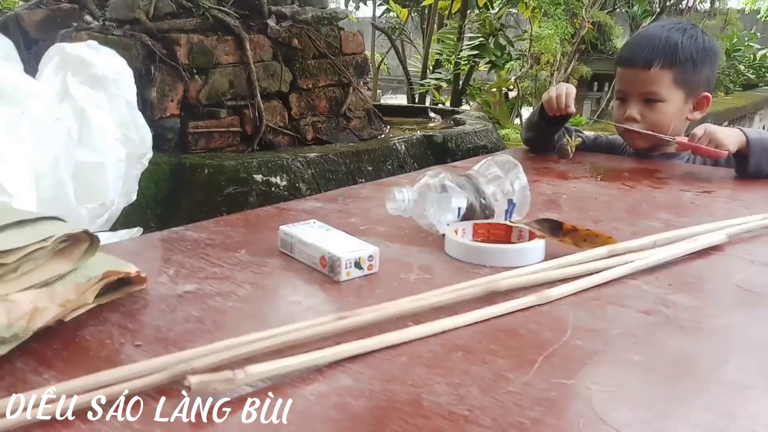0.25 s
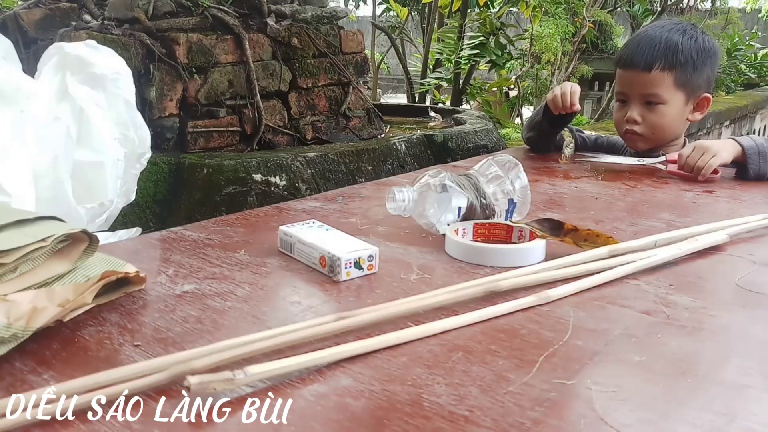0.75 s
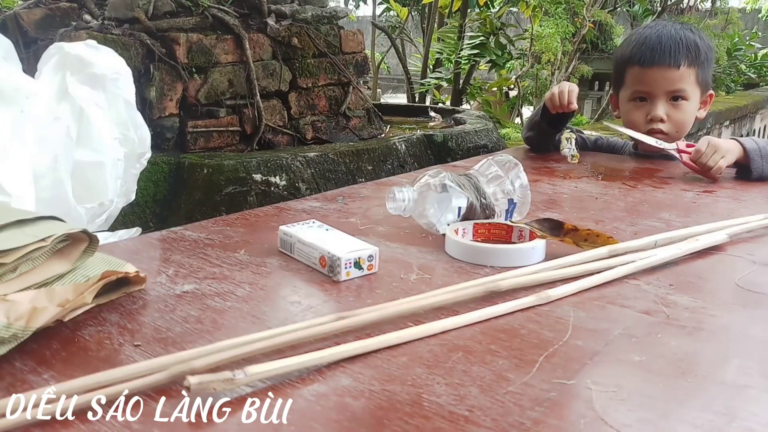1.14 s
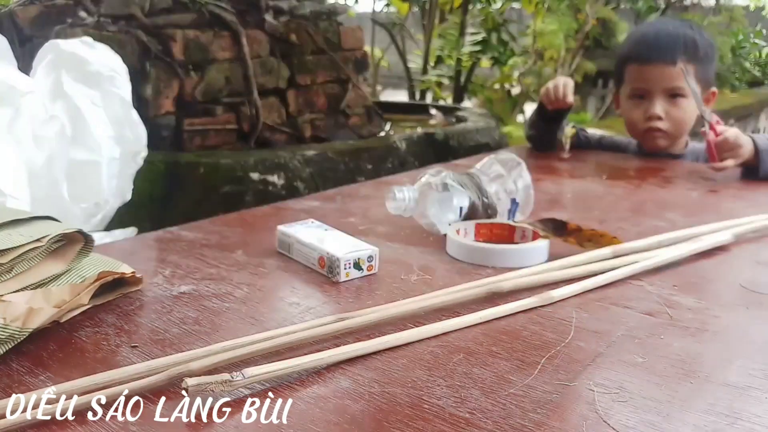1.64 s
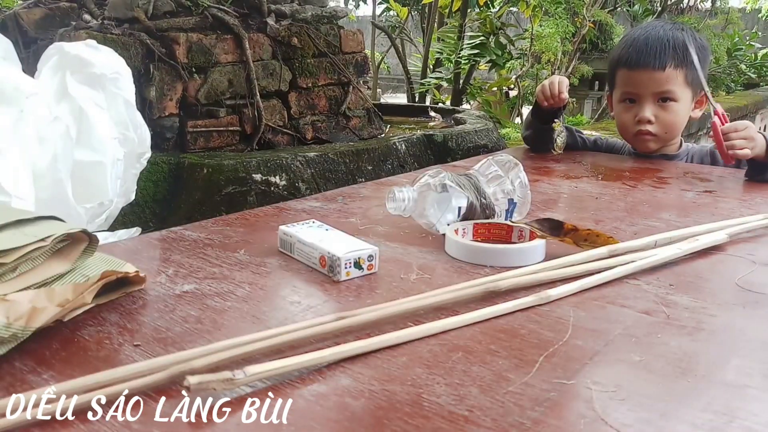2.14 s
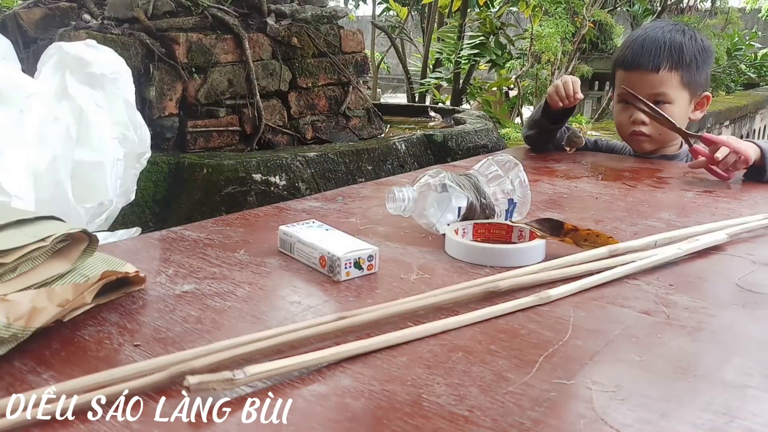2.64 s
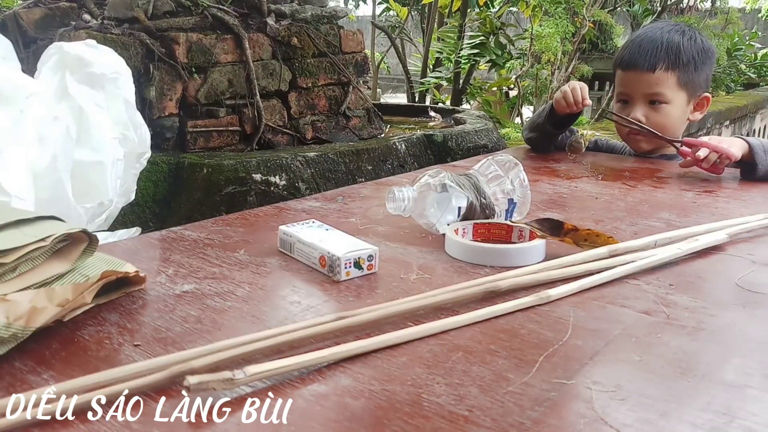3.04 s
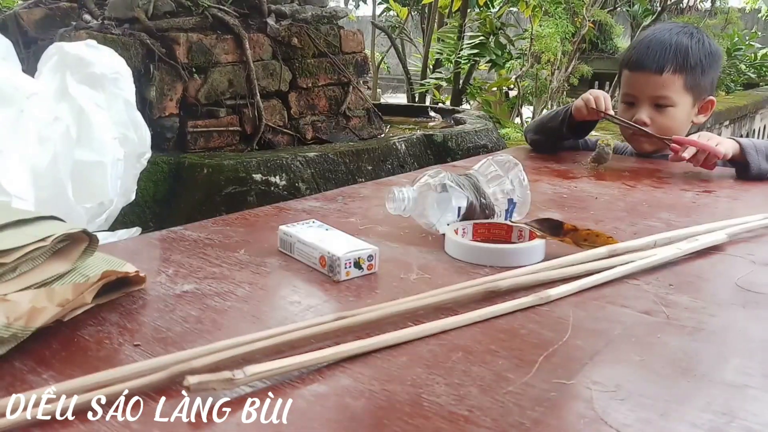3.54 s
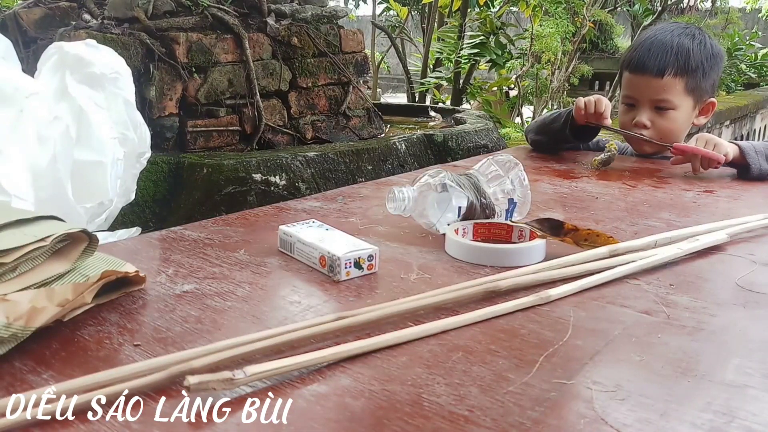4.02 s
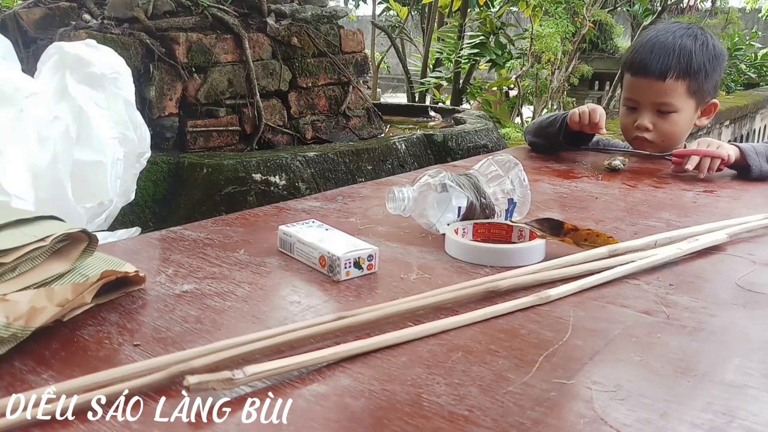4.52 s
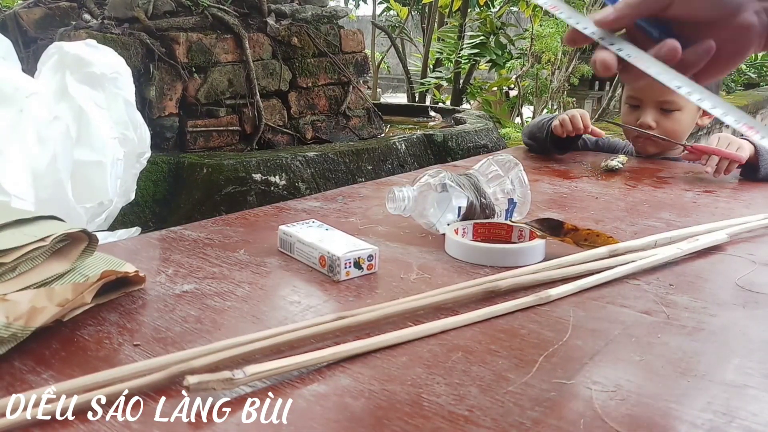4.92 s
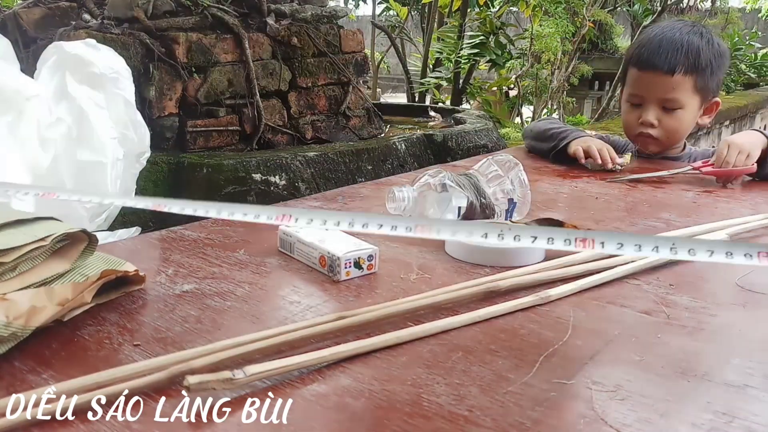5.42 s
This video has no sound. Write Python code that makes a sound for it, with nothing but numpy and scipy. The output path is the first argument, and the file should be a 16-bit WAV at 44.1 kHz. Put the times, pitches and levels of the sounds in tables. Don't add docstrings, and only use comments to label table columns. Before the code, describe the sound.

A close stereo pickup at a wooden table in an open yard, with low traffic murmur, leaves and slight hiss. A faint tick and rub come first; at 0.55 s bamboo sticks hit the top with a loud crack and woody boom, rebounding until about 0.75, with a smaller knock at 0.9. A faint skid follows near 1.1. A distant hoarse rooster call wavers from 0.2 to 2.1 s, and a bird gives a short falling whistle at 1.4, then a slightly rising one at 1.65. From 1.7 to 2.6 thin steel tape ticks rapidly amid dry rattling, with stick cracks at 2.25 and bright clicks near 2.4 and 2.5. Sparse dull clicks and soft rustles run to 4.1. Low knocks come at 4.3 and 4.75, with light tape ticks. From 5.3 contacts thicken into snaps and rattling, peaking in a loud hollow double knock near 5.6 that rings briefly to the end.

```python
import sys
import numpy as np
from scipy import signal
from scipy.fft import rfft, irfft, next_fast_len
from scipy.io import wavfile
from scipy.ndimage import uniform_filter1d

SR = 44100
rng = np.random.default_rng(int(sys.argv[2]) if len(sys.argv) > 2 else 0)


def attenuation_scalar(level_db):
    decades = np.asarray(level_db, float) / 20
    return 10 ** decades


def int16_out(signal):
    q = np.round(np.clip(np.atleast_2d(signal).T, -1, 1) * 32767)
    wavfile.write(sys.argv[1], SR, q.astype(np.int16))


N = 250047
LAG, STICK_LAG = 13, 8
CONTROL_STEP = 32

# (centre [Hz], width [Hz], level [dB])
DEEP_MODES = [(66.5, 39, -19), (124, 21, -3), (169.6, 15.4, -1), (209.2, 11, -9.5)]
# (centre [Hz], width [Hz], level [dB])
UPPER_MODES = [(297, 73, 0.5), (394, 31, 1.5), (485, 75, -4.5)]
# (centre [Hz], width [Hz], level [dB])
STICK_TONES = [(787, 400, 11), (1178, 296, 3.5)]
# (centre [Hz], width [Hz], level [dB])
HARD_TONES = [(1583, 76, 8), (2039, 42, 2.5)]


def table():
    gain, upper_db, stick_db = spells()
    rub = rng.standard_normal((2, N)) * grit(per_s=200, spread_db=1.5, smooth=2.5)
    shaking = modes(rub[0], DEEP_MODES) + attenuation_scalar(upper_db) * modes(rub[0], UPPER_MODES)
    top = gain * attenuation_scalar(-1.0) * shaking + knocks() + scuff()

    pair = rub[0] + np.array([[0], [1.25]]) * rub[1]
    level = gain * attenuation_scalar(stick_db - 3.0)
    hard = np.sqrt(level / level.max())
    sticks = level * (modes(pair, STICK_TONES) + attenuation_scalar(-2.0) * hard * modes(pair, HARD_TONES))
    sticks[0] = late(sticks[0], STICK_LAG) * attenuation_scalar(3.0)
    return np.array([late(top, count=7) * attenuation_scalar(0.94), top * attenuation_scalar(-0.5)]) + sticks


# (time [s], peak [dB], favoured mode [Hz], stick ring [Hz], stick ring [dB])
KNOCKS = [(0.555, -8, 423, 1346, -5), (0.59, -15.5, 298, 820, -18), (0.623, -15.5, 130, 726, -9),
          (0.692, -25.5, 148, 1500, 4.5), (0.718, -28, 65.5, 1540, -20), (0.905, -21.5, 124, 1358, 4.5),
          (0.939, -19.5, 198, 720, -20), (2.7, -43.5, 394, 780, 21), (4.177, -29, 181, 680, -10),
          (4.259, -27, 190, 616, -1), (4.294, -12.5, 188, 640, -19), (4.715, -38, 190, 850, 12),
          (4.758, -18.5, 250, 600, -4), (4.93, -35.5, 188, 606, 3), (5.361, -17.5, 296, 1440, -5),
          (5.385, -23.5, 120, 835, -9), (5.427, -32, 296, 890, 11), (5.487, -44, 549, 1080, -4),
          (5.535, -31, 120, 610, 7), (5.617, -15, 300, 750, 4), (5.652, -13, 203, 623, -8),
          (5.568, -9, 363, 1200, -3.5), (5.593, -5.5, 332, 725, -2)]


def knocks():
    out, t = np.zeros(N), np.arange(SR // 4) / SR
    onset = 1 - np.exp(-t / 0.0017)
    for s, db, spot_hz, ring_hz, ring_db in KNOCKS:
        boom = 0
        for hz, width, mode_db in DEEP_MODES + UPPER_MODES:
            octaves_off = abs(np.log2(hz / spot_hz))
            decay = np.exp(-np.pi * 0.8 * width * t)
            boom = boom + attenuation_scalar(mode_db - 39.0 * octaves_off) * decay * np.sin(2 * np.pi * hz * t)
        ring = attenuation_scalar(ring_db - 60 * t / 0.031) * np.sin(2 * np.pi * ring_hz * t)
        add(out, s + 0.001506, attenuation_scalar(db - 10.5) * (boom / abs(boom).max() + ring) * onset)
    return out


# (time [s], boom [dB], fall [s], upper modes [dB], stick share [dB])
JOLTS = [(0.555, -27.5, 0.075, -1, 7.5), (0.588, -36.5, 0.15, 2.5, 6.5), (0.9042, -38.5, 0.15, 0, 2.5),
         (2.704, -49, 0.18, 4.5, 8.5), (3.751, -54.5, 0.1, -3.5, 9), (4.18, -47.5, 0.2, 1, -13),
         (4.262, -43, 0.049, 11, -25), (4.716, -44, 0.12, 5, -3.5), (5.326, -68.5, 0.56, 20, 22.5),
         (5.364, -46.5, 1, 3, -0.5), (5.488, -46.5, 0.013, 4, 24.5), (5.57, -33, 0.067, 10.5, 7),
         (5.594, -20.5, 0.14, 3, 0)]
# (peak time [s], boom [dB], fall [s], upper modes [dB], stick share [dB])
SLIDES = [(.63, -33, 0.027, 5, -3.5), (0.726, -40.5, 0.11, 0, 0.5), (3.151, -65.5, 0.16, 0.5, 12),
          (3.27, -51, 0.31, -11.5, -25.5), (4.303, -34, 0.057, 0, -10), (4.42, -55, 0.32, -9, -13),
          (4.773, -42, 0.11, -3.5, -14), (4.942, -52, 0.043, 4.5, -7), (5.089, -63, 0.14, 6.5, -11),
          (5.55, -48.5, 0.072, -8, 3)]


def spells():
    power = 0
    for s, db, fall, upper_db, stick_db in JOLTS:
        parts = ((0, 1), (upper_db, 0.94), (stick_db, 0.57))
        power = power + np.array([hump(s, db + d, rise=0.0014, fall=fall * share) for d, share in parts])
    for s, db, fall, upper_db, stick_db in SLIDES:
        swell = hump(s, db, rise=fall, fall=fall)
        power = power + swell * attenuation_scalar(2 * np.array([[0], [upper_db], [stick_db]]))
    boom, upper, stick = map(level_of, power)
    return attenuation_scalar(boom), upper - boom, stick - boom


# (level [dB], from [Hz], to [Hz])
SCUFF = (-53.5, 457, 440)


def scuff():
    db, start_hz, end_hz = SCUFF
    start_s, length_s = 1.05, 0.16
    out, u = np.zeros(N), np.linspace(0, 1, round(length_s * SR))
    hz = start_hz + (end_hz - start_hz) * u
    tone = resonate(resonate(rng.standard_normal(len(u)), hz, 91.0), hz, 220.0)
    add(out, start_s, attenuation_scalar(db) * np.sin(np.pi * u) ** 0.49 * evened(tone))
    return out


# (time [s], peak [dB], ring [Hz], bright part [dB])
SNAPS = [(0.3685, -33.5, 6300, -39), (1.701, -40, 6360, -8), (1.7127, -38, 6440, -10),
         (1.7381, -31, 6060, -12), (1.7971, -32, 5470, -15), (1.8175, -23.5, 5850, -15),
         (1.849, -31, 5600, -20), (1.8657, -31, 5630, -29), (1.9004, -31.5, 6060, -14),
         (1.932, -32.5, 6400, -12), (1.9668, -26, 6100, -21), (1.9983, -33.5, 6100, -23),
         (2.0297, -39, 6270, -18), (2.0617, -40.5, 6400, -16), (2.097, -36.5, 6200, -12),
         (2.129, -38, 6400, -15), (2.1662, -58, 6590, -18), (2.2056, -41, 5700, -20),
         (2.344, -26, 6830, -18), (2.359, -51, 6000, -12), (2.389, -23.5, 5860, -14),
         (2.393, -20.5, 4960, -12), (2.433, -32, 5470, -12), (2.463, -35, 5800, -16),
         (2.5172, -34, 5150, -16), (2.537, -37, 6840, -3), (2.76, -52, 6000, -3), (3.192, -47, 5500, -25),
         (3.9, -55, 6800, -4), (3.909, -43, 5250, -22), (3.982, -40.5, 6330, -31), (4.645, -45, 6840, -21),
         (4.722, -29, 6600, -15), (4.7426, -26, 6400, -13), (4.8698, -40, 6840, -19),
         (5.1471, -46, 5700, -17), (5.2888, -42.5, 6000, -16), (5.3052, -40, 5200, -9),
         (5.3265, -33, 5000, -5), (5.33, -35, 6000, -23), (5.388, -35, 4500, -4), (5.444, -31, 4400, -12),
         (5.463, -32, 6900, -1), (5.4905, -18.5, 5100, -19)]
# (time [s], peak [dB], ring [Hz], bright part [dB])
CLICKS = [(.9117, -32, 2950, -33), (1.054, -38.5, 2940, -8), (1.1068, -33.5, 2580, -35),
          (2.371, -13, 2780, 13.5), (2.4153, -29, 3330, -19), (2.4243, -23.5, 2310, -10),
          (2.4554, -30, 2760, -1), (2.4839, -14, 2710, -14), (2.579, -41, 3280, -12),
          (2.61, -44, 3650, -14), (2.6556, -36.5, 3320, -14), (2.6895, -40, 3340, -16),
          (2.809, -43.5, 3040, -31), (2.8308, -44, 3270, -39), (2.9199, -32, 3410, -19),
          (2.965, -27.5, 3100, -26), (3.1242, -30, 2640, -23), (3.2077, -23, 3200, -26),
          (3.4426, -46.5, 3150, -19), (3.455, -47, 3300, -30), (3.492, -48.5, 3500, -34),
          (3.595, -50, 3500, -28), (3.635, -46.5, 3300, -30), (4.145, -54, 3200, -30),
          (4.757, -37, 2900, -25), (3.5185, -25, 3130, -19), (3.681, -42, 3480, -31),
          (3.7274, -38, 3030, -43), (3.7527, -29.5, 3130, -44), (4.161, -41.5, 3100, -35),
          (4.2914, -37, 2530, -36.5), (4.4285, -30.5, 3300, -30), (4.4712, -21, 2880, -39)]
# (time [s], peak [dB], ring [Hz], bright part [dB], length [ms])
CRACKS = [(0.5554, -4, 5120, -15, 1), (0.5892, -17, 5200, -17, 1.4), (0.682, -45, 3960, -32, 4),
          (0.905, -35, 3950, -33, 0.44), (1.825, -23, 5450, -22, 8.1), (2.224, -40, 3750, -20, 3.3),
          (2.237, -39, 5030, -12, 8.6), (2.2426, -19, 4100, -16, 1.5), (2.2506, -19.5, 3900, -20, 3.5),
          (2.2586, -19, 4160, -18, 2.4), (2.316, -33, 5000, -12, 2.5), (2.322, -23, 5800, -9, 4.1),
          (4.0673, -46, 5860, -20, 1.7), (4.0926, -37, 4950, -20, 1.5), (4.6569, -31, 5300, -15, 3.3),
          (4.838, -39, 4750, -18, 5.5), (5.567, -24, 4800, 12, 3.9), (5.5938, -4, 3780, -18, 0.77)]
# (frequency [Hz], density [dB per Hz])
AIRY = [(4120, -23.5), (7000, -10), (7840, -13), (9630, -12), (15000, -21.5), (15900, -46.5),
        (16300, -40.5)]
# (frequency [Hz], density [dB per Hz])
NO_BASS = [(600, -90)]


def ticks():
    # length [ms], share of broad crack beside the ring, lag [samples]
    rows = [(*row, 2.4, 0.9, LAG) for row in SNAPS]
    rows += [(*row, 1.3, 0.75, LAG) for row in CLICKS]
    rows += [(*row, 0.9, STICK_LAG) for row in CRACKS]
    out, top, t = np.zeros((2, N)), np.zeros((2, N)), np.arange(1700) / SR
    first_touch = 2.18 * (abs(t - 0.0003) < 0.00004)
    thin = signal.butter(3, [1500., 7600.], "band", fs=SR, output="sos")
    for s, db, hz, bright_db, ms, share, lag in rows:
        a, b = rng.standard_normal((2, len(t))) + first_touch
        length = np.clip(ms, 0.3, 12) / 1000
        crack = (1 - np.exp(-t / (0.06 * length))) * np.exp(-t / length)
        ring = signal.sosfilt(thin, resonate(resonate(a * crack, hz, 970.0), hz, 1900.0))
        wide = signal.sosfilt(thin, resonate(resonate(b * crack, 6500.0, 4800.0), 5600.0, 7600.0))
        tick = attenuation_scalar(db) * (ring / abs(ring).max() + share * wide / abs(wide).max())
        bright = attenuation_scalar(db + bright_db) * b * crack
        for port, delay in enumerate((lag / SR, 0)):
            add(out[port], s + delay, tick)
            add(top[port], s + delay, bright)
    out = attenuation_scalar(-0.44) * (out + attenuation_scalar(-4.0) * colour(top, NO_BASS + AIRY)) * sides()
    hollow = pops()
    return out + np.array([late(hollow, STICK_LAG) * attenuation_scalar(1.2), hollow * attenuation_scalar(-0.1)])


# (time [s], peak [dB])
POPS = [(.5886, -46), (2.2445, -38), (2.255, -34), (2.298, -43.5), (2.3223, -40), (2.4243, -42),
        (2.4839, -37.5), (3.4426, -43), (3.7527, -28), (4.2914, -25.5), (3.455, -44), (4.4712, -28),
        (4.671, -36.5), (4.692, -35.5), (5.11, -39), (4.7222, -31.5), (4.7431, -42.5), (5.3303, -33.5),
        (5.4899, -22.5), (5.5931, -32)]


def pops():
    out, t = np.zeros(N), np.arange(1300) / SR
    envelope = np.exp(-t / 0.0024) * (1 - np.exp(-t / 0.00072))
    rows = POPS + [(row[0], -47.5) for row in CLICKS]
    for s, db in rows:
        hz = 640 * attenuation_scalar(0.7 * rng.standard_normal())
        add(out, s, attenuation_scalar(db) * np.sin(2 * np.pi * hz * t) * envelope)
    return out


# (frequency [Hz], density [dB per Hz])
DRY = [(880, -12), (1500, -13.5), (1920, -8.5), (3010, 0.5), (3370, -5), (3920, 0), (4420, -1), (5870, 0.5),
       (6720, -2.5), (7750, -27.5), (9000, -25), (11700, -55.5), (19800, -120)]


def rustle():
    level_db, bright_db = handling()
    noise = rng.standard_normal((3, N)) * grit(per_s=700, spread_db=3, smooth=1.2)
    scrapes = patchy(ports(noise[0], noise[1:]), spread_db=2.4)
    body = evened(colour(scrapes, NO_BASS + DRY))
    airy = evened(colour(scrapes, NO_BASS + AIRY))
    return (body + airy * attenuation_scalar(bright_db)) * attenuation_scalar(level_db) * sides() ** 0.6


# (peak time [s], level [dB], rise [s], fall [s], brightness [dB])
SHAKES = [(0.557, -24.5, 0.0032, 0.081, -6), (.592, -31, .004, 0.11, -15.5),
          (0.907, -43, 0.0021, 0.051, -43), (0.948, -49, .004, 0.14, -4), (1.148, -53, .004, 0.062, -3.5),
          (5.465, -39, 0.0047, 0.05, 6.5), (1.7, -45.5, 0.0072, 0.14, 8), (1.823, -32.5, 0.024, 0.1, -1.5),
          (1.799, -36.5, 0.022, 0.018, -4), (1.966, -44, 0.004, 0.027, 9), (1.998, -48, 0.0045, 0.071, 2),
          (1.933, -49, .004, 0.024, 4), (2.097, -59.5, .004, 0.029, 11), (2.227, -37.5, .004, 0.056, -17),
          (2.238, -34, 0.013, 0.22, -0.5), (2.391, -40.5, 0.017, 0.11, -2),
          (2.484, -39.5, 0.0047, 0.051, 4.5), (2.585, -51.5, 0.02, 0.096, -3),
          (2.701, -48.5, 0.059, 0.055, -7), (2.965, -47, 0.056, 0.042, -19),
          (3.128, -41, 0.084, 0.061, -13.5), (3.199, -54.5, 0.033, 0.097, -12.5),
          (3.524, -50.5, 0.0065, 0.044, -8), (3.776, -42.5, 0.022, 0.055, -7.5),
          (3.919, -58.5, 0.075, 0.52, -9.5), (4.069, -49.5, 0.032, 0.033, -7),
          (4.284, -53, 0.095, 0.061, -11.5), (4.475, -53.5, 0.22, 0.13, -8.5), (4.755, -45, 0.12, 0.085, 0),
          (5.152, -59, 0.055, 0.12, -7.5), (5.333, -37.5, 0.019, .14, -4), (5.594, -24, 0.012, 0.095, -8)]
# (start [s], level [dB], hold [s], brightness [dB])
RUBS = [(0.357, -60, 0.35, -0.5), (0.69, -42, 0.015, -50), (0.972, -55.5, 0.13, -2.5),
        (1.17, -66, 0.71, -8.5), (1.434, -62.5, 0.15, 7), (1.627, -56.5, 0.055, 1.5),
        (2.098, -59.5, 0.13, -4), (2.76, -65, 0.099, -12), (3.452, -66.5, .09, -31),
        (3.614, -66, 0.16, -36), (4.632, -49.5, 0.069, -1), (4.821, -56.5, 0.15, 2),
        (5.497, -38, 0.068, -4)]


def handling():
    idle_db, idle_bright_db = -74, -27
    parts = [(hump(s, db, rise, fall), bright) for s, db, rise, fall, bright in SHAKES]
    parts += [(hump(s, db, 0.068, 0.083, hold), bright) for s, db, hold, bright in RUBS]
    body = level_of(attenuation_scalar(2 * idle_db) + sum(power for power, _ in parts))
    airy_power = sum(power * attenuation_scalar(2 * bright) for power, bright in parts)
    airy = level_of(attenuation_scalar(2 * (idle_db + idle_bright_db)) + airy_power)
    return body, airy - body


def patchy(x, spread_db):
    z = signal.stft(x, nperseg=256, noverlap=192)[2]
    spots = rng.standard_normal(z.shape[1:])
    spots = uniform_filter1d(spots, size=3, axis=0)
    spots = evened(uniform_filter1d(spots, size=14, axis=1))
    return signal.istft(z * attenuation_scalar(spread_db * spots), nperseg=256, noverlap=192)[1][:, :N]


# (time [s], left over right [dB])
HANDS = [(0, -2), (1.5, -5), (2.3, -3), (3.6, -4), (4.1, -3.5), (4.8, -4), (5.3, -1), (5.67, 1.5)]


def sides():
    pan_db, = columns(HANDS, np.arange(N) / SR)
    return attenuation_scalar(np.array([pan_db, -pan_db]) / 2)


# (time [s], pitch [Hz], level [dB])
WHISTLES = [
    [(1.38, 1500, -65), (1.4, 1448, -65), (1.435, 1430, -51.5), (1.465, 1275, -68)],
    [(1.595, 1280, -61), (1.615, 1334, -53.5), (1.68, 1345, -53), (1.73, 1380, -71)],
]
# (time [s], pitch [Hz], level [dB], second harmonic [dB])
CROW = [(.2, 770, -60.5, -16), (.3, 761, -65, -7), (.6, 775, -60, -5), (1.0, 790, -60, -8.5),
        (1.18, 785, -56.5, -3.5), (1.3, 775, -61.5, -7), (1.4, 790, -71, -5), (1.5, 795, -65, 4),
        (1.6, 785, -63.5, -7), (1.8, 755, -63.5, 0), (1.95, 755, -66, 2), (2.1, 750, -75.5, 13.5),
        (2.2, 723, -87, 12)]


def birds():
    out = np.zeros(N)
    for rows in WHISTLES:
        t = np.arange(rows[0][0], rows[-1][0], 1 / SR)
        hz, db = columns(rows, t)
        note = np.sqrt(2) * np.sin(2 * np.pi * np.cumsum(hz) / SR)
        add(out, t[0], attenuation_scalar(db + 3.5) * note * signal.windows.tukey(len(t), 0.15))

    t = np.arange(N) / SR
    hz, db, octave_db = columns(CROW, t)
    breath = rng.standard_normal(N)
    first = evened(resonate(resonate(breath, hz, 55.), hz, 90.))
    second = evened(resonate(resonate(breath, 2 * hz, 55.), 2 * hz, 90.))
    calling = (t >= CROW[0][0]) & (t <= CROW[-1][0])
    waver_db = 3 * evened(uniform_filter1d(rng.standard_normal(N), size=3500))
    out += calling * attenuation_scalar(db - 9 + waver_db) * (first + attenuation_scalar(octave_db) * second)
    return np.array([np.roll(out, 4) * attenuation_scalar(-2.5), out * attenuation_scalar(3.0)])


def walls(x):
    length, spacing = SR // 4, 20
    taps = np.zeros((2, length))
    slots = np.arange(100, length - spacing, spacing)
    at = slots + rng.integers(0, spacing, (2, len(slots)))
    np.put_along_axis(taps, at, rng.choice([-1., 1.], at.shape), 1)
    taps *= attenuation_scalar(-60 * np.arange(length) / SR / 0.21)
    return signal.fftconvolve(x, taps / np.linalg.norm(taps[0]), axes=1)[:, :N]


# (frequency [Hz], density [dB per Hz])
YARD = [(12, -42), (20, -5.5), (71, 7), (194, -11), (402, -12), (548, -8.5), (667, -9.5), (858, -10),
        (1380, -17.5), (1730, -33.5), (5320, -27.5), (6290, -45.5), (7240, -32.5), (15000, -30.5),
        (16300, -63.5)]


def yard():
    noise = rng.standard_normal((3, N))
    swell_db = 2.0 * evened(uniform_filter1d(rng.standard_normal(N), 9000))
    return attenuation_scalar(-62 + swell_db) * evened(colour(ports(noise[0], noise[1:]), YARD))


# (frequency [Hz], shared power [0 to 1])
LIKENESS = [(60, 1), (300, 0.15), (700, 0.93), (3000, 0.033), (9000, 0.02)]


def ports(shared, own):
    same = np.clip(read(LIKENESS, np.fft.rfftfreq(N, 1 / SR)), 0, 1)
    pair = rfft(np.array([np.roll(shared, LAG), shared]))
    return irfft(np.sqrt(same) * pair + np.sqrt(1 - same) * rfft(own), N)


def grit(per_s, spread_db, smooth):
    hits = rng.random(N) < per_s / SR
    size = attenuation_scalar(spread_db * np.minimum(rng.exponential(1, N), 4)) * hits
    return evened(signal.oaconvolve(size, np.exp(-np.arange(900) / 71.0))[:N]) + smooth


def resonate(x, hz, width):
    turn = np.exp(2j * np.pi * np.cumsum(hz * np.ones(x.shape[-1])) / SR)
    r = np.exp(-np.pi * width / SR)
    return 2 * (turn * signal.lfilter([1 - r], [1, -r], x / turn)).real


def modes(x, rows):
    return evened(sum(attenuation_scalar(db) * resonate(resonate(x, hz, w), hz, 2 * w) for hz, w, db in rows))


def hump(s, db, rise, fall, hold=0.):
    t = np.arange(0, N + CONTROL_STEP, CONTROL_STEP) / SR
    drop = np.maximum((s - t) / max(rise, 1e-3), (t - s - hold) / max(fall, 1e-3))
    return attenuation_scalar(2 * (db - 23.5 * np.clip(drop, 0, 8)))


def level_of(power):
    return np.interp(np.arange(N), np.arange(len(power)) * CONTROL_STEP, 10 * np.log10(power))


def colour(x, points):
    size = next_fast_len(N + 4096)
    gain = attenuation_scalar(read(points, np.fft.rfftfreq(size, 1 / SR)))
    return irfft(rfft(x, size) * gain, size)[..., :N]


def read(points, hz):
    f, value = np.transpose(points)
    return np.interp(np.log(hz + 1), np.log(f + 1), value)


def columns(rows, t):
    s, *rest = np.transpose(rows)
    return [np.interp(t, s, c) for c in rest]


def evened(x):
    return x / np.sqrt(np.mean(x ** 2) + 1e-20)


def late(x, count):
    return np.pad(x, (count, 0))[:N]


def add(mix, s, sound):
    part = mix[..., round(s * SR):][..., :sound.shape[-1]]
    part += sound[..., :part.shape[-1]]


def scene():
    near, far = ticks(), birds()
    echoes = walls(attenuation_scalar(-15) * near + attenuation_scalar(-10) * far)
    return table() + near + rustle() + far + echoes + yard()


def top_cut(x):
    return signal.sosfilt(signal.butter(12, 16480, fs=SR, output="sos"), x)


def record(dry):
    cut = signal.sosfilt(signal.butter(3, 45., "high", fs=SR, output="sos"), dry)
    cut = signal.sosfilt(signal.butter(14, 15500., fs=SR, output="sos"), cut)
    knee = cut / (1 + abs(cut) ** 4) ** 0.25 * 0.97
    return top_cut(knee)


dry = scene()
out = record(dry)
int16_out(out)
```